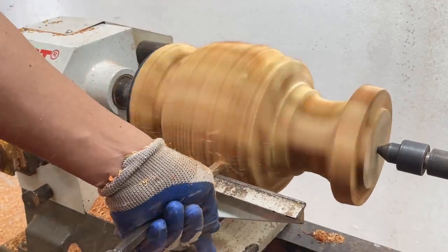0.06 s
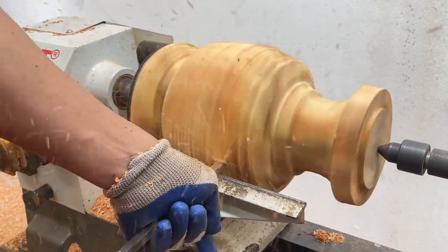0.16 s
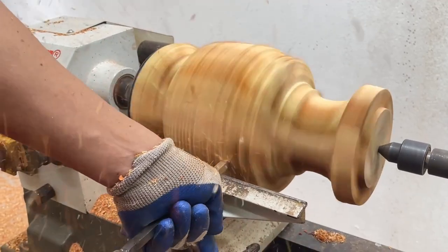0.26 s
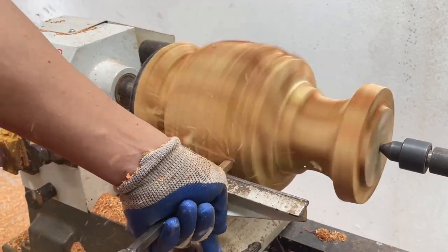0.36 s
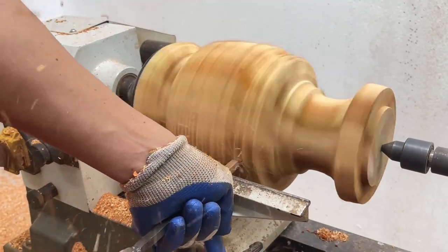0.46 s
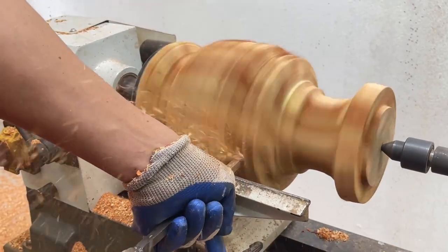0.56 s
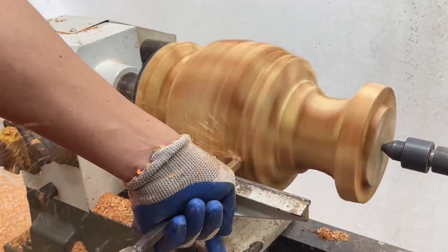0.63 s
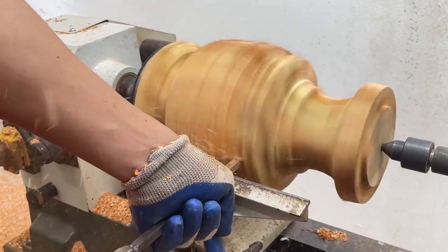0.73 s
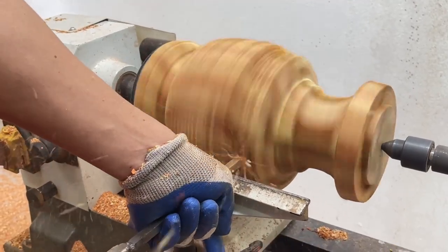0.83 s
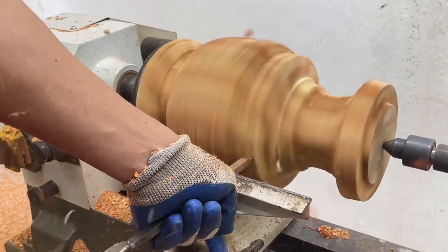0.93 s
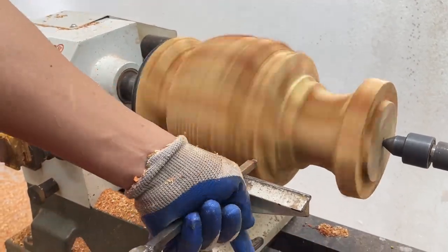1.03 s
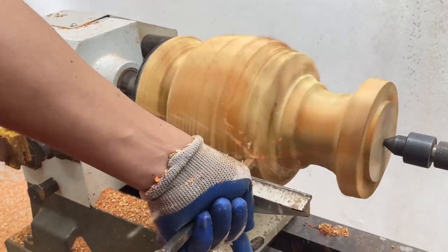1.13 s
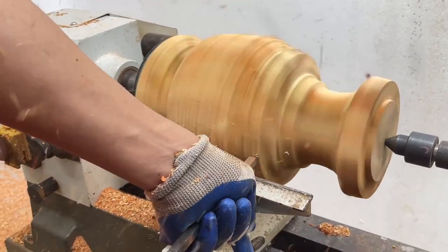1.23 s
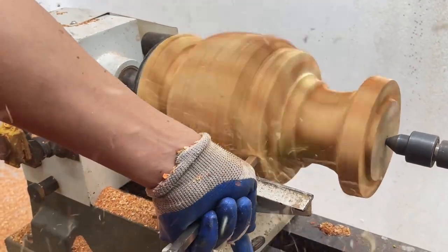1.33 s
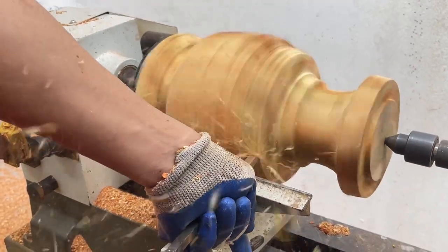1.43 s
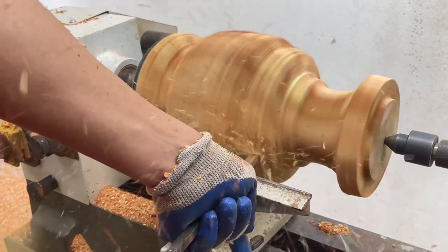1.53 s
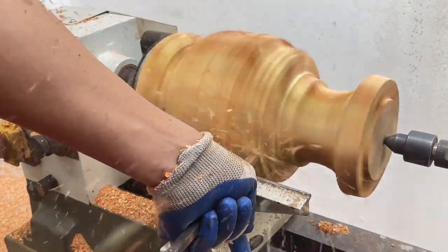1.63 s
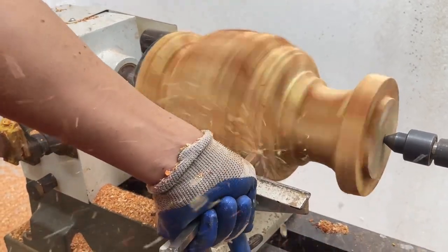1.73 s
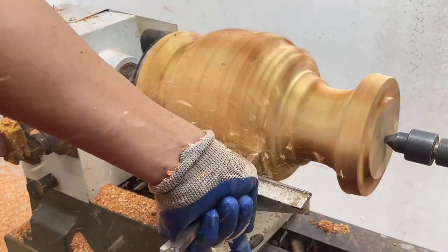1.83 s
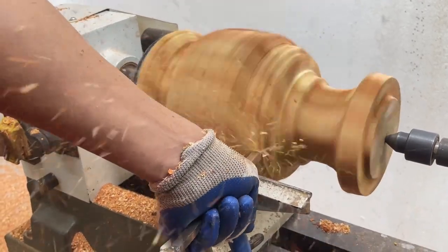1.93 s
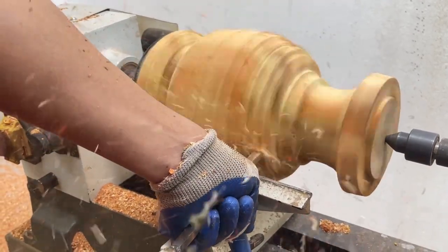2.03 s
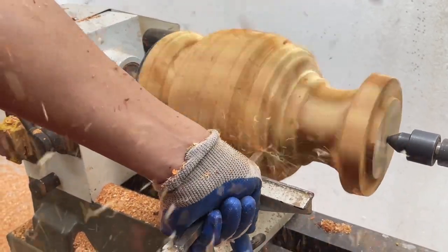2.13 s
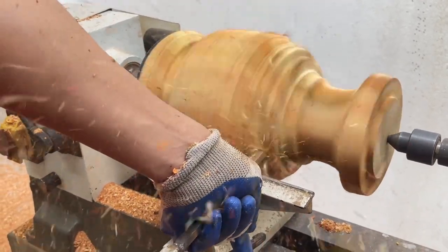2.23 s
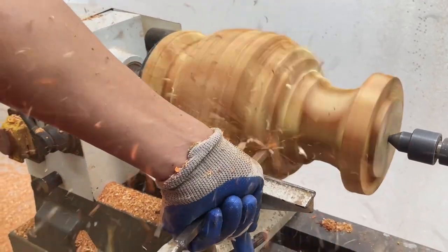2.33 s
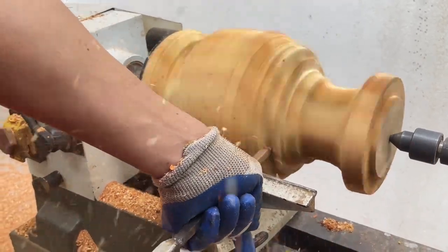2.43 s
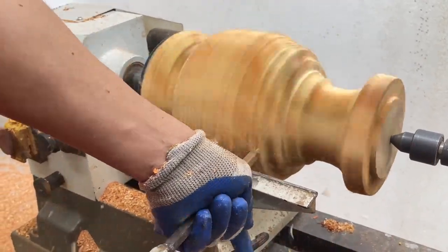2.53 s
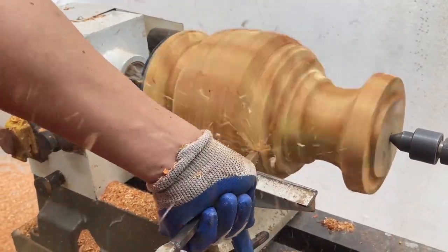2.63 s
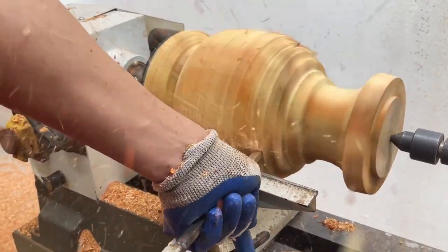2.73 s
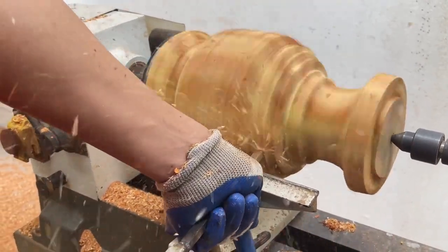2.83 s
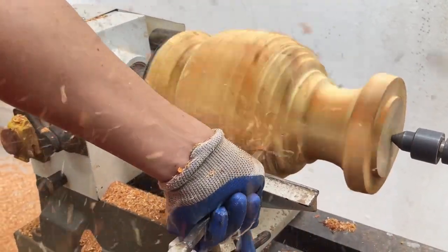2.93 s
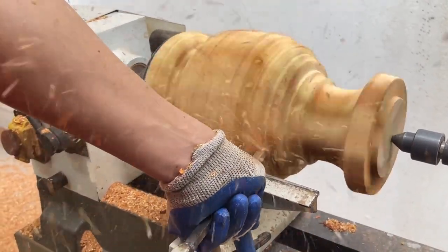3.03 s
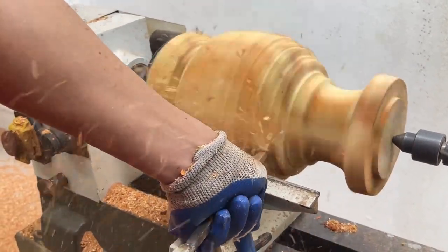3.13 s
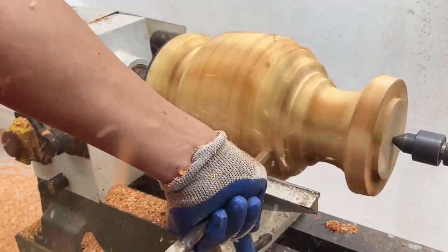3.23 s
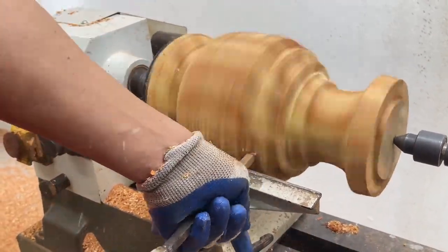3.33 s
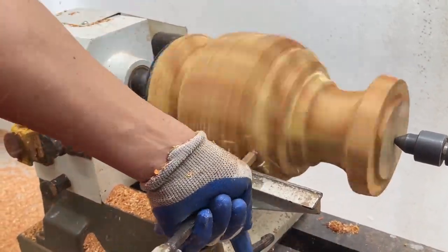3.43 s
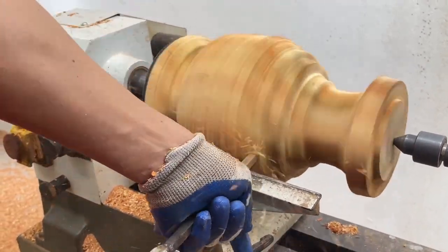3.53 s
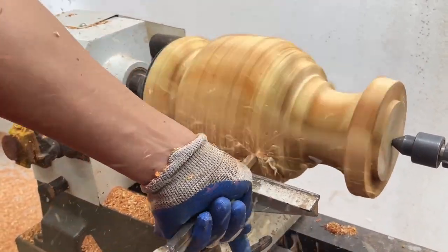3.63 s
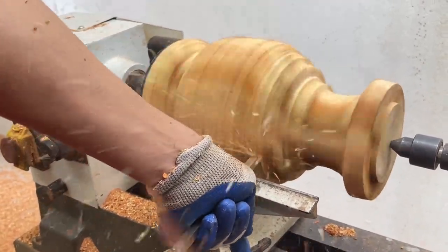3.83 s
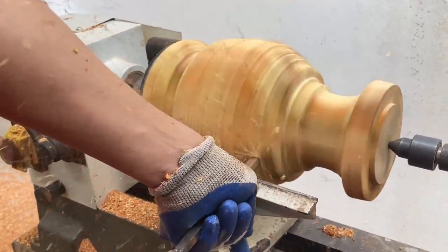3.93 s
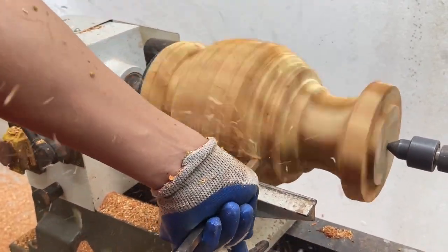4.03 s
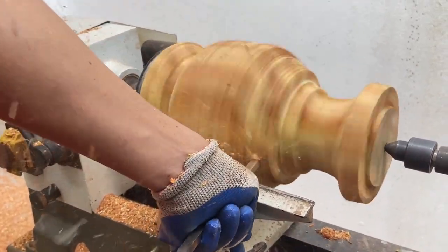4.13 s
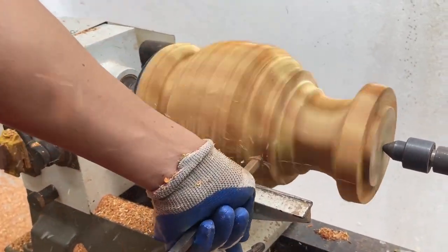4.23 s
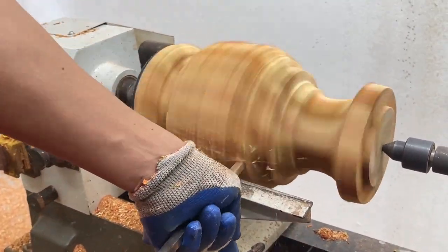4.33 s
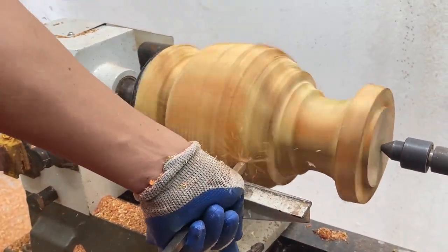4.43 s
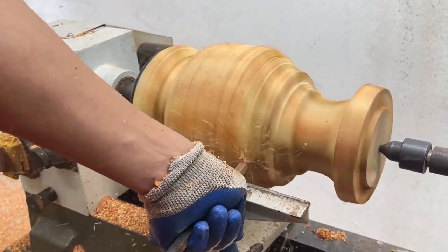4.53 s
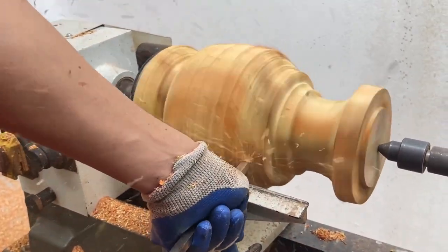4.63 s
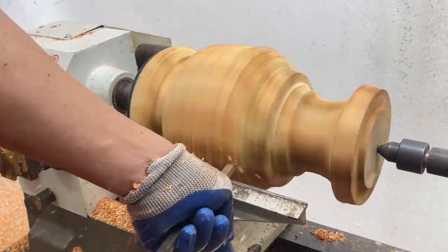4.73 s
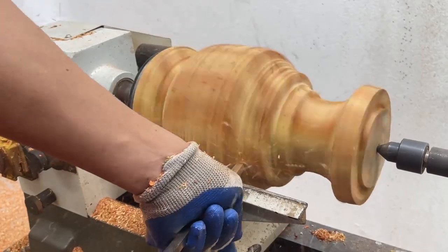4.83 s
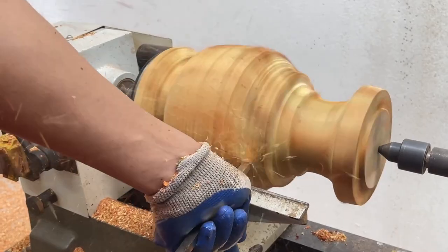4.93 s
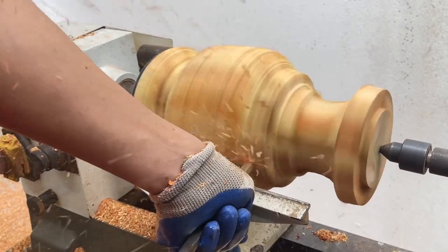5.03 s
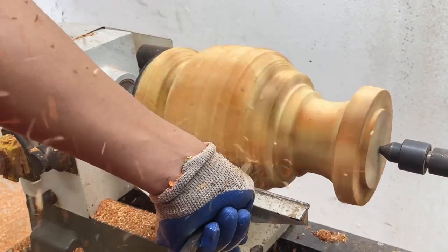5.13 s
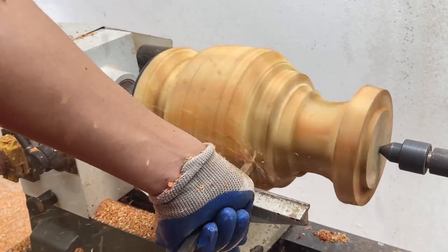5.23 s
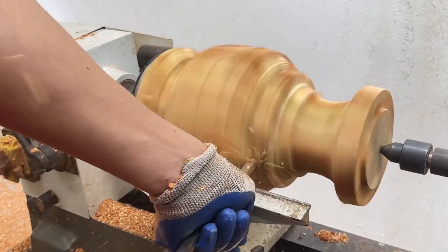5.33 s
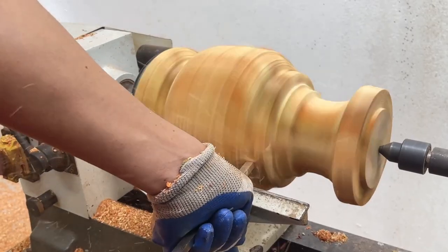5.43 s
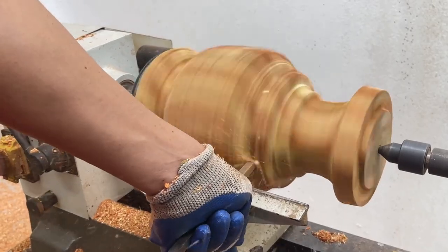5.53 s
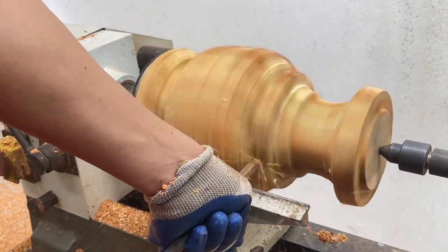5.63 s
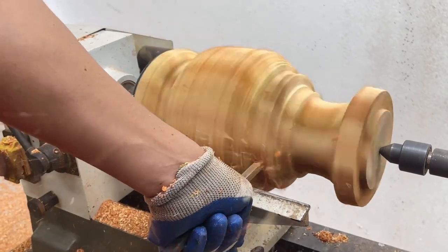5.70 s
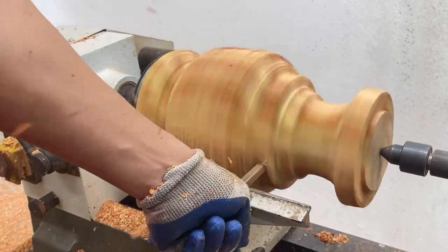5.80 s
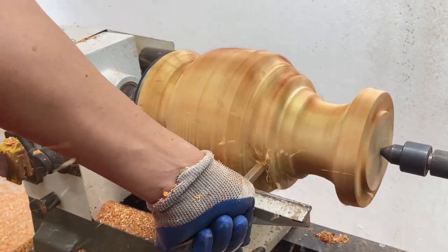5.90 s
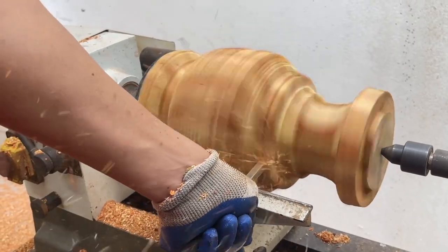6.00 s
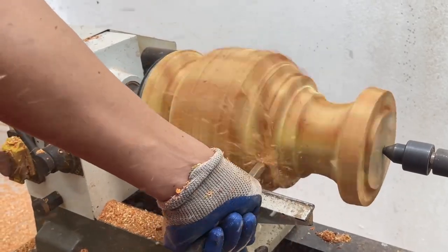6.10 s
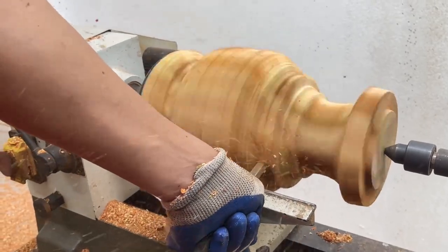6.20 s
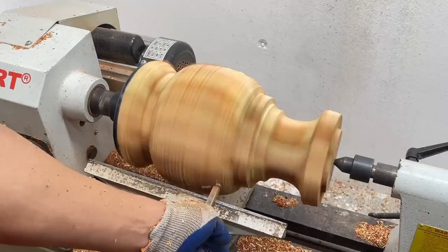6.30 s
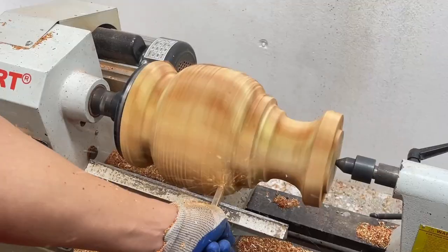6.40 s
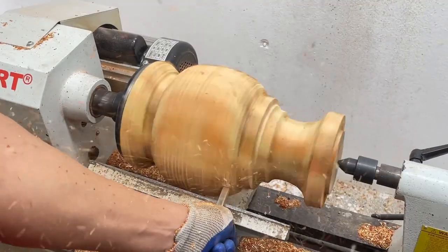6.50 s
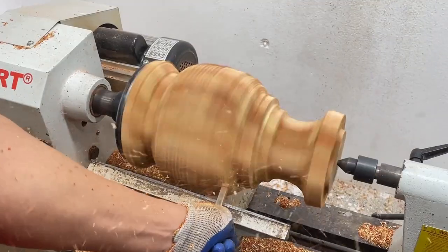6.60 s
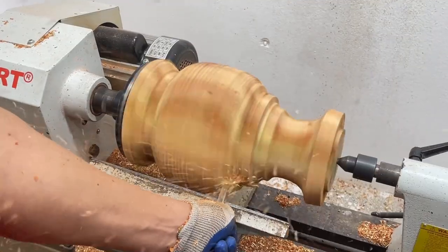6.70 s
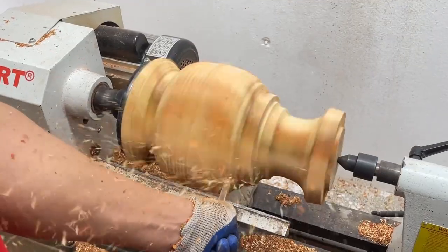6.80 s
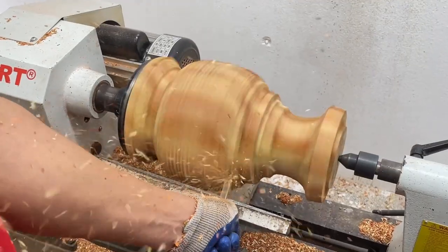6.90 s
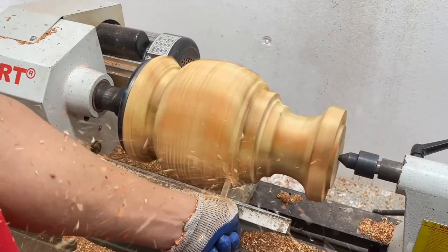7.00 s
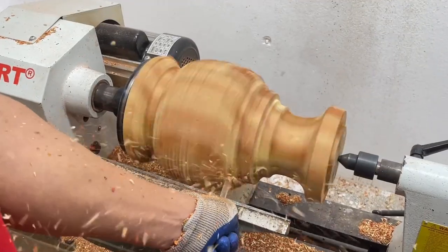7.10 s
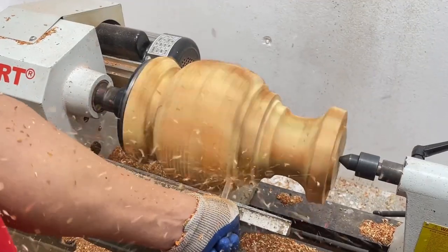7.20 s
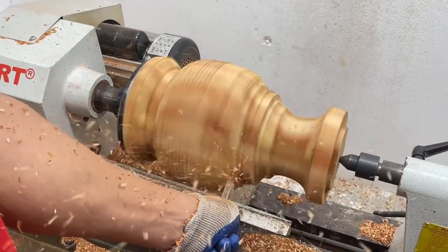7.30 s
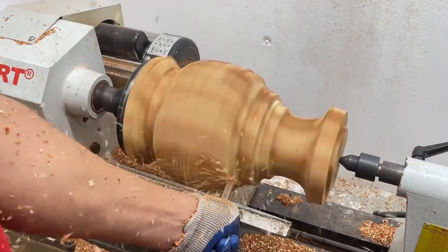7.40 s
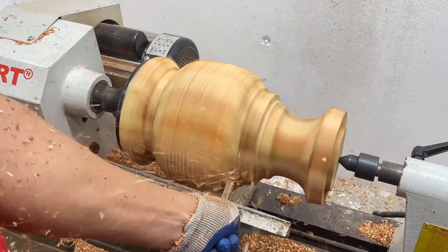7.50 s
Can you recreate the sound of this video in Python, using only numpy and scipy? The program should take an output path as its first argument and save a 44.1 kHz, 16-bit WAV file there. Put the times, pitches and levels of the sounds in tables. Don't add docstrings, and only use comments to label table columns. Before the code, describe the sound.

A close stereo microphone in a small, fairly dry workshop hears a lathe motor whining low-mid, with bearing noise, as a gouge cuts spinning wood. At first contact is light; by 0.3 s a bright, gritty hiss fills in, and the tool rest sings a buzzing, beating tone around 0.7-0.85 s. Near 1.0-1.15 s the cut falls away, exposing the whine and a tiny squeak, then bites back. Thick tearing continues with glassy steel ringing around 1.9 and 3 s. Short lift-offs come near 2.55, 3.4-3.6, 4.35 and 4.8 s, each followed by a sharp bite. Chatter hums in bursts from 5.2 to 5.7 s; the blade shank sings loudest around 5.8-6.3 s. At 6.33 s sound vanishes for an instant, then resumes with changed wood resonance, hissing strongly until a final easing around 7.5 s. Dull thuds recur throughout.

```python
import sys
import numpy as np
from scipy import signal
from scipy.fft import rfft, irfft, next_fast_len
from scipy.io import wavfile
from scipy.ndimage import uniform_filter1d

SR = 44100
rng = np.random.default_rng(int(sys.argv[2]) if len(sys.argv) > 2 else 0)


def level_to_linear(level):
    exponent = np.asarray(level, float) / 20
    return 10 ** exponent


def to_wav(s):
    ch = np.atleast_2d(s).T
    pcm = np.round(np.clip(ch, -1, 1) * 32767)
    wavfile.write(sys.argv[1], SR, pcm.astype(np.int16))


N = 332955
T = np.arange(N) / SR
LONG = next_fast_len(N)
HZ = np.fft.rfftfreq(LONG, 1 / SR)
BREAK_S, RESUME_S = 6.328, 6.3445
BLADE_EDGE_DB = 12


def evened(x):
    return x / np.sqrt(np.mean(x ** 2) + 1e-20)


def filtered(x, response):
    return irfft(rfft(x, LONG) * response, LONG)[..., :N]


def coloured(x, response):
    return evened(filtered(x, response))


def below(hz, steepness):
    return 1 / (1 + (HZ / hz) ** steepness)


def above(hz, steepness):
    return 1 / (1 + (hz / (HZ + 1)) ** steepness)


def shape(points):
    hz, db = np.transpose(points)
    return level_to_linear(np.interp(np.log(HZ + 1), np.log(hz + 1), db))


def modes(table):
    total = 0
    for k, (hz, width_hz, db) in enumerate(table):
        damping = 1j * width_hz * HZ
        total = total + (-1) ** k * level_to_linear(db) * damping / (hz ** 2 - HZ ** 2 + damping)
    return total


def resonate(x, hz, width_hz):
    turn = np.exp(2j * np.pi * np.cumsum(hz * np.ones(N)) / SR)
    r = np.exp(-np.pi * width_hz / SR)
    return evened((turn * signal.lfilter([1 - r], [1, -r], x / turn)).real)


def drift(top_hz):
    return coloured(rng.standard_normal(N), below(top_hz, 4))


def decaying(x, decay_s):
    return signal.lfilter([1], [1, -np.exp(-1 / (decay_s * SR))], x)


def bumps_db(rows, power=2):
    return sum(db * np.exp(-((T - s) / half) ** power) for s, half, db in rows)


def humps(rows, edge_db):
    power = 0
    for middle, half, db, *_ in rows:
        away = np.minimum(abs(T - middle) / half, 3)
        power = power + level_to_linear(db - edge_db * away ** 2.65) ** 2
    return np.sqrt(power)


# hz, level_db
OVERTONES = [(568, -56.5), (855.9, -60.5), (1098, -67), (1400, -63)]
# hz, density_db_per_hz
MOTOR_NOISE = [(200, -10.5), (330, 6.5), (500, -18), (850, -1.5), (1400, -9.5), (2500, -15), (4000, -17.5),
               (7300, -13.5), (8500, -26), (11000, -43), (15700, -38)]
# middle_s, half_s, whine_db
FREE = [(0.05, 0.26, -39), (0.9, 0.07, -40.5), (1.12, 0.093, -36), (1.36, 0.035, -39.5), (2.6, 0.079, -42),
        (3.24, 0.036, -43), (3.45, 0.057, -41), (3.6, 0.14, -43), (4.38, 0.086, -46), (4.84, 0.036, -38),
        (5.28, 0.055, -44), (5.88, 0.56, -47), (6.39, 0.047, -31.5), (6.49, 0.051, -37),
        (6.68, 0.025, -38.5), (7.04, 0.028, -42), (7.5, 0.14, -46.5)]


def motor():
    whine_hz, loaded_db = 286.4, -51
    whine_db = 20 * np.log10(np.hypot(level_to_linear(loaded_db + 2.2 * drift(2.9)), humps(FREE, edge_db=5.5)))
    turned_s = np.cumsum(1 + 0.0036 * drift(3.66)) / SR
    whine = np.sqrt(2) * np.cos(2 * np.pi * whine_hz * turned_s)
    sound = level_to_linear(whine_db - 4.5 + 3.8 * drift(25.0)) * whine
    noise = rng.standard_normal((2, N))
    for hz, db in OVERTONES:
        sound = sound + level_to_linear(db + 0.78 * (whine_db + 42)) * resonate(noise[0], hz, 24)
    squeaking = (T > 1.078) & (T < 1.143)
    sound = sound + level_to_linear(-56) * squeaking * resonate(noise[0], 4845, 25)
    return sound + level_to_linear(-48.5) * coloured(noise, shape(MOTOR_NOISE))


# hz, density_db_per_hz
THUD = [(20, -36), (45, -29), (70, -22), (110, -10.5), (160, 0), (230, -2), (340, 3.5), (480, -50)]
# middle_s, half_s, change_db
SHIFTS = [(0.037, 0.18, 7), (0.324, 0.087, -12), (0.673, 0.12, 7.5), (2.118, 0.067, 8), (2.314, 0.014, 13),
          (2.44, 0.073, -22), (3.015, 0.17, -1.5), (3.34, 0.11, 8), (3.486, 0.028, 10), (3.778, 0.079, -7),
          (4.173, 0.068, -7), (4.363, 0.14, 10), (4.88, 0.049, 9.5), (5.203, 0.021, 12), (5.606, 0.087, -2),
          (6.078, 0.059, 12), (6.301, .25, 7.5), (6.824, 0.081, -12), (6.97, 0.067, 4.5),
          (7.251, 0.17, -38)]
# time_s, level_db
KNOCKS = [(.262, 5), (.353, 7), (.802, 2), (1.148, 7), (1.628, 10), (1.895, 11), (2.56, 2), (3.249, 10),
          (3.707, 10), (3.837, 10), (4.308, 7), (4.689, 15), (5.401, 11), (5.744, 4), (5.914, 2),
          (5.984, 11), (6.09, 9.5), (6.401, 5), (6.485, 7), (6.985, 2), (7.408, 8)]


def thuds():
    thud_db, knock_s, deep_hz, deep_rest_db, deep_lumps_db = -57, .014, 150, -2, 1.5
    shift_db = bumps_db(SHIFTS, power=4)
    knock_db = bumps_db([(s, knock_s, db) for s, db in KNOCKS])
    lumps = drift(6.7)
    sound = coloured(rng.standard_normal((2, N)) * level_to_linear(2.8 * drift(25.0)), shape(THUD))
    deep = filtered(sound, below(deep_hz, 8))
    deep_db = np.minimum(deep_rest_db + deep_lumps_db * lumps + knock_db, 3)
    sound = sound + (level_to_linear(deep_db) - 1) * deep
    return level_to_linear(thud_db + shift_db + knock_db + 1.9 * lumps) * sound


# start_s, leaving_s, clear_s, biting_s, drop_db
LIFTS = [(-0.1, .01, 0.086, 0.039, -11), (0.86, 0.013, 0.075, 0.015, -5.5), (1.0, 0.084, 0.095, 0.046, -42),
         (1.259, 0.0065, 0.039, .015, -2.5), (1.307, 0.012, 0.013, 0.012, -17),
         (2.496, 0.044, 0.046, 0.1, -22), (2.562, .01, .03, .014, -16), (3.54, .012, .022, .006, -5),
         (4.335, 0.011, 0.051, 0.01, -23), (4.79, 0.014, 0.025, .004, -12),
         (5.876, 0.025, 0.01, 0.0085, -25), (6.345, .003, 0.027, .01, -8),
         (3.344, 0.061, 0.052, 0.017, -33), (3.425, 0.012, 0.023, 0.013, -5),
         (3.46, 0.0041, 0.12, 0.013, -6.5), (3.522, 0.025, 0.027, 0.012, -34),
         (4.307, 0.06, 0.0087, 0.13, -18.5), (4.767, 0.016, .01, 0.13, -25),
         (5.84, 0.044, 0.0088, 0.082, -12), (5.72, 0.018, 0.0083, 0.024, 0.5),
         (6.326, 0.0047, 0.029, 0.039, -22), (6.332, 0.0051, 0.09, 0.022, -8.5),
         (6.63, 0.019, 0.032, 0.048, -5.5), (7.541, 0.017, 0.074, 0.12, 7)]


def lifted():
    leave_curve, bite_curve = 0.78, 1.76
    total_db = 0
    for start, leaving, clear, biting, db in LIFTS:
        off = np.clip((T - start) / leaving, 0, 1) ** leave_curve
        still_off = np.clip(1 - (T - start - leaving - clear) / biting, 0, 1) ** bite_curve
        total_db = total_db + db * off * still_off
    return total_db


# time_s, peak_db
DIGS = [(.9222, -25), (0.9518, -21), (0.9676, -20), (1.213, -19), (1.225, -22), (1.247, -24), (1.3473, -22),
        (1.62, -22), (2.6145, -30), (2.6413, -20), (3.1726, -21), (3.473, -34), (3.5845, -22),
        (4.4039, -23), (4.4267, -24), (4.8404, -15), (5.9264, -29), (6.311, -21), (6.4378, -22),
        (6.4756, -21), (7.0687, -22), (7.172, -23), (7.3835, -25)]
# middle_s, half_s, level_db
SURGES = [(0.048, 0.0033, 7), (0.223, 0.008, 4.5), (0.265, 0.0192, 2.0), (0.385, 0.014, 3.1),
          (0.53, 0.0243, 3), (0.688, 0.0067, 2.5), (0.931, 0.0056, 7), (0.99, 0.0049, 3.8),
          (1.216, 0.0082, 3), (1.258, 0.0041, 3), (1.42, 0.0083, 5), (1.536, 0.017, 2.5),
          (1.721, 0.0055, 1), (1.766, 0.0096, 1), (1.91, 0.005, 2.5), (2.088, 0.0039, 2),
          (2.118, 0.016, 1.5), (2.247, 0.0052, 1.5), (2.323, 0.0078, 3), (2.37, 0.009, 3.5),
          (2.427, 0.0069, 5.5), (2.445, 0.0082, 4), (2.678, 0.0217, 1.5), (2.81, 0.017, 2.0),
          (2.85, 0.01, 4), (2.967, 0.0036, 4), (3.007, 0.0097, 2), (3.278, 0.0068, 2.5),
          (3.331, 0.079, -0.5), (3.49, 0.0087, 6), (3.735, 0.0093, 5), (3.786, 0.021, 3.5),
          (3.864, 0.0048, -3), (3.944, 0.0073, 1.5), (4.075, 0.007, -1), (4.226, 0.0053, 4),
          (4.51, 0.013, 2.1), (4.645, 0.006, 3), (4.72, 0.034, 4.0), (5.159, 0.0062, 2), (5.176, 0.0044, 7),
          (5.286, 0.0089, -0.5), (5.361, 0.0082, -1), (5.452, 0.0069, 3), (5.66, 0.0038, 5),
          (5.774, 0.0036, 0), (5.783, 0.015, 3.5), (6.003, 0.0101, 4), (6.114, 0.0054, -4),
          (6.196, 0.014, 2), (6.311, 0.0053, 2.8), (6.47, 0.004, 1), (6.967, 0.0076, 0.5),
          (7.105, 0.0073, 1), (7.254, 0.0076, 2.5), (7.42, 0.015, -2.5), (7.471, 0.012, 1.5),
          (7.543, 0.0063, 4.5)]


def tearing():
    snaps_per_s, fray_s, chip_over_db, chip_s, chip_share = 1200, 0.00054, 13.0, .0012, .8
    dig_rise_s, dig_fall_s = .004, 0.008
    grain = level_to_linear(0.11 * drift(60.0) + 0.25 * drift(130.0)) * level_to_linear(bumps_db(SURGES))
    snaps = level_to_linear(4.0 * np.minimum(rng.exponential(1, N), 3.3)) * (rng.random(N) < snaps_per_s / SR)
    burst = decaying(snaps, fray_s)
    dig = 1 + chip_share * decaying(snaps > level_to_linear(chip_over_db), chip_s)
    for s, db in DIGS:
        rise = np.clip((T - s) / dig_rise_s, 0, 1)
        dig += level_to_linear(db + 19.5) * rise * np.exp(-np.clip(T - s, 0, 1) / dig_fall_s)
    return dig * grain * np.sqrt(1 + 0.11 * evened(burst) ** 2)


# start_s, swing_from, swing_to, low_mode_from_db, low_mode_to_db
PASSES = [(0.0, -0.47, .15, 5, -3), (1.15, 0.074, 0.44, 14.5, 13), (1.9, 0.56, 1.05, 13, 10.5),
          (2.58, 0.15, 0.99, 9, 16.5), (3.42, 0.17, 0.11, 11, 8), (3.85, .1, 0.98, 12.5, 14.5),
          (4.39, 0.31, 0.62, 14, 6.5), (4.82, 0.31, 0.53, 4, 12), (5.05, 0.65, 0.79, 13.5, 8.5),
          (5.72, 0.29, 0.46, 3, -11), (5.9, 0.25, 2.4, 6.5, 2), (6.34, 0.36, 0.4, 5, 16.5),
          (6.7, 0.55, 0.9, 14, 26)]


def swing():
    start, swing_from, swing_to, db_from, db_to = np.transpose(PASSES)
    k = np.clip(np.searchsorted(start, T, "right") - 1, 0, None)
    done = (T - start[k]) / np.diff(np.append(start, N / SR))[k]
    buried = swing_from[k] + (swing_to - swing_from)[k] * done
    return buried, db_from[k] + (db_to - db_from)[k] * done


# hz, density_db_per_hz
FIBRES = [(2000, -55), (3450, -13), (3650, -8), (3880, -10), (4150, -16), (4500, -16.5), (5000, -1),
          (8000, 0), (9000, 3.5), (10200, 1), (12000, -3.5), (13600, 3.5), (15700, -20)]
# hz, width_hz, level_db
STEEL = [(6080, 60, -9), (6450, 60, -8), (6610, 70, -7), (7000, 36, -9), (7220, 60, -8), (7400, 30, -8),
         (8930, 370, -11), (10800, 100, -3), (11350, 110, -4), (11590, 60, -3), (12650, 400, -8),
         (14800, 280, -3), (15600, 120, -6)]


def fibre_hiss(air, steel, buried):
    bright_db = 14 - 28 * np.maximum(buried, 0) ** 0.78
    hiss = coloured(air, shape(FIBRES)) + level_to_linear(3.0) * coloured(steel, modes(STEEL) * (HZ > 3000))
    top = filtered(hiss, above(12500, 16))
    return hiss + (level_to_linear(0.3 * bright_db - 2.0) - 1) * top


# middle_s, half_s, level_db, from_hz, to_hz
GLIDES = [(0.065, 0.19, 10, 12400, 12700), (.4, 0.46, 4, 15100, 14400), (.62, 0.37, 13.5, 14200, 12700),
          (1.25, 0.13, 3, 13000, 12900), (1.5, 0.17, 11.5, 12600, 11900), (1.85, 0.2, 1, 12200, 11500),
          (2.552, .05, 3, 12900, 13000), (2.72, 0.15, 10, 13000, 11900), (3.0, 0.17, -9, 12200, 12100),
          (3.494, 0.091, 14.5, 12900, 13100), (3.73, 0.1, 15.5, 13050, 12600),
          (4.026, 0.12, 9.5, 12400, 12670), (4.549, 0.2, 8, 12900, 12400), (4.87, .06, 0, 13300, 13100),
          (6.395, .03, 3, 13100, 13200), (6.498, 0.094, 11, 13500, 12800), (6.7, 0.24, 9.5, 13000, 12600)]


def whistles(edge):
    out = np.zeros((2, N))
    for middle, half, db, hz_from, hz_to in GLIDES:
        hz = np.interp(T, [middle - half, middle + half], [hz_from, hz_to])
        out += humps([(middle, half, db)], edge_db=4.5) * resonate(edge, hz, 520)
    return out


# middle_s, half_s, level_db
FLUTE = [
    (1.85, 0.43, 5),
    (2.3, .3, -10),
    (3.05, 0.34, 6.5),
    (4.1, 0.18, 7),
    (4.6, 0.3, -7),
    (5.3, .4, -10),
    (6.0, 0.2, -8),
    (7.25, 0.36, 5.5),
]
# middle_s, half_s, level_db
SHANK = [
    (0.3, .5, -15),
    (2.35, 0.34, 1.5),
    (3.3, 0.11, 2),
    (4.25, 0.16, -0.5),
    (4.7, 0.12, -16),
    (5.3, 0.32, 0),
    (5.78, 0.25, 5),
    (6.17, 0.29, 6.5),
]


def blade_ring(air, edge, buried, low_db, lift_db):
    roll_hz = bumps_db([(5.97, 0.6, 420)]) * (T < RESUME_S)
    low_hz = 9207 - 330 * buried + 200 * (T > RESUME_S) - roll_hz
    blade = level_to_linear(low_db + .55 * lift_db) * resonate(edge, low_hz, 330) + whistles(edge)
    blade = blade + humps(FLUTE, BLADE_EDGE_DB) * resonate(air, 11260, 190)
    return blade + humps(SHANK, BLADE_EDGE_DB) * resonate(edge, 5186, 165)


# hz, width_hz, level_db
BODY = [(797, 45, -3), (943.5, 44, 0.5), (1092, 15.4, -1), (1229.5, 12.2, 7), (1390, 8.6, 9.5),
        (1640, 30, -4), (2033, 35.5, 2.5), (2236, 16.5, 0.5), (2690, 48, -0.5), (2920, 59, -4),
        (3162, 35, 3.5), (4434, 17, -2)]
# hz, width_hz, level_db
BODY_MOVED = [(843, 33, -2.5), (918, 46, -4.5), (982, 25, -2.5), (1253, 11, 5), (1383, 9.6, 12.5),
              (1550, 36, -8), (1720, 46, -5), (1895, 50, 3.5), (2030, 28, 9), (2267, 19, 1), (2670, 23, -3),
              (2894, 39, 3.5), (3140, 23, 1), (4470, 70, -17)]
# hz, density_db_per_hz
BODY_WASH = [(71, -63), (120, -32), (410, 10.5), (484, -4), (1360, 2), (2010, 3.5), (2450, -21), (3080, 1),
             (3430, -41), (4500, -36), (5850, -87), (9900, -120)]


def blank_and_rest(air, steel, edge):
    rings = np.where(T < RESUME_S, coloured(steel, modes(BODY)), coloured(steel, modes(BODY_MOVED)))
    flare = humps([(.38, .22, 8)], BLADE_EDGE_DB) * resonate(edge, 2730, 60)
    return coloured(air, shape(BODY_WASH)) + level_to_linear(7.0) * rings + flare


# time_s, hiss_db, body_over_hiss_db
PRESSURE = [(0.0, -50.5, -2), (0.17, -45, -1.5), (0.3, -36.5, -7.5), (0.85, -35, -1.5), (1.0, -33, -6.5),
            (1.5, -37.5, 1.5), (2.15, -33, -3), (2.8, -36, 0), (3.3, -37, -1), (3.62, -37, -1.5),
            (3.78, -35, -0.5), (4.6, -37.5, 0), (5.2, -34.5, -1.5), (5.5, -37, -1.5), (6.3, -37, -0.5),
            (6.6, -34.5, 2.5), (6.9, -33.5, 0.5), (7.55, -42.5, 3)]
# middle_s, half_s, change_db
PLOUGH = [(.3, .12, 0.5), (0.636, .04, -3.5), (0.977, 0.043, 3), (2.15, 0.06, 1), (2.524, 0.047, 3),
          (2.73, 0.2, -2), (3.49, 0.033, -3.5), (4.348, 0.018, -2), (4.86, .04, -1), (4.93, 0.025, 5),
          (5.264, 0.016, -5.5), (5.78, 0.023, -1.5), (5.85, 0.023, -2), (6.41, .03, 1.5),
          (6.595, 0.046, 5.5), (6.729, 0.024, 5)]
# hz, gain_db
LIGHT = [(1000, 3.5), (2200, 0.5), (2400, -5), (2730, 2), (3150, 2.5), (5200, -4), (6300, -1), (8500, -4.5),
         (11000, -4), (12300, -4), (15000, -3.5)]
# hz, gain_db
MOVED = [(300, -3), (1000, 2.5), (2000, -5), (2900, 0.5), (5200, -3.5), (7000, -2), (10000, -3),
         (11000, -0.5), (13500, 0.5), (14800, 2), (15700, -5)]


def cut(lift_db):
    ring_s, plough_hz, light_until_s = 0.012, 7500, 1.1
    time_s, hiss_db, body_db = np.transpose(PRESSURE)
    force = level_to_linear(np.interp(T, time_s, hiss_db) + lift_db + 0.5 * drift(14.4))
    fade = np.exp(-1 / (ring_s * SR))
    shaking = np.sqrt(signal.lfilter([1 - fade], [1, -fade], force ** 2))
    shaking = shaking * level_to_linear(np.interp(T, time_s, body_db) - 7.5)
    buried, low_db = swing()
    air, steel, edge = tearing() * rng.standard_normal((3, 2, N))
    hiss = fibre_hiss(air, steel, buried)
    blade = blade_ring(air, edge, buried, low_db, lift_db)
    near = force * (level_to_linear(3.0) * hiss + level_to_linear(-5.0) * blade) + shaking * blank_and_rest(air, steel, edge)
    near = near + (level_to_linear(bumps_db(PLOUGH)) - 1) * filtered(near, below(plough_hz, 12))
    notch_hz, notch_width_hz, notch_db = 3900, 160, -8
    away, damping = notch_hz ** 2 - HZ ** 2, 1j * notch_width_hz * HZ
    near = filtered(near, (away + level_to_linear(notch_db) * damping) / (away + damping))
    near = np.where(T < light_until_s, filtered(near, shape(LIGHT)), near)
    return np.where(T < RESUME_S, near, filtered(near, shape(MOVED)))


# middle_s, half_s, level_db, pitch_hz
SONGS = [(0.662, 0.031, -36, 415), (0.773, 0.097, -29, 415.7), (0.83, 0.039, -28.5, 413),
         (0.916, 0.026, -44, 422), (1.424, 0.097, -42.5, 422.4), (1.762, 0.3, -43.5, 426),
         (2.819, 0.047, -38.5, 414), (3.787, .06, -40.5, 423), (4.543, 0.018, -41, 424),
         (4.916, 0.018, -39, 412), (5.182, 0.01, -33, 414), (5.224, 0.02, -35, 416.7),
         (5.311, 0.038, -37.5, 419), (5.393, 0.035, -32.5, 421.6), (5.448, 0.017, -29, 420),
         (5.487, 0.014, -31, 415.5), (5.564, 0.12, -36, 425.5), (5.626, 0.06, -32.5, 409.5),
         (5.704, 0.0082, -31, 417.4), (6.09, 0.064, -39, 426), (6.215, 0.081, -36.5, 418.5),
         (6.586, 0.024, -37, 425), (6.846, 0.17, -40.5, 424.5), (7.199, 0.041, -36, 416.3),
         (7.272, 0.059, -41, 417.8), (7.385, 0.064, -40.5, 420)]


def chatter(lift_db):
    chatter_hz, width_hz, shaft_hz, beat_top_s = 419, 26, 19.5, .763
    hum_db = -47.5 + 0.78 * uniform_filter1d(lift_db, size=2000)
    hum = level_to_linear(hum_db - 24 * np.exp(-T / 0.049) + 2.0 * drift(1.7))
    level = np.hypot(hum, humps(SONGS, edge_db=6.5))
    level_db = 20 * np.log10(level)
    middle, _, _, pitch_hz = np.transpose(SONGS)
    waver = drift(6.06)
    hz = np.interp(T, middle, pitch_hz) + 3.094 * waver
    ring = resonate(rng.standard_normal((2, N)), chatter_hz, width_hz)
    ring = resonate(ring, chatter_hz, 44)
    turn = 2 * np.pi * np.cumsum(hz) / SR
    beat = 0.15 + 0.9 * (T > 0.7) * (T < 0.81)
    tone = np.cos(turn) + beat * np.cos(turn + 2 * np.pi * shaft_hz * (T - beat_top_s))
    tone = tone + level_to_linear(level_db + 13.5) * np.cos(2 * turn)
    locked = np.clip((level_db + 47.5) / 12, 0, .96)
    mix = np.sqrt(1 - locked ** 2) * ring + locked * tone * np.sqrt(2 / (1 + beat ** 2))
    return level * level_to_linear(.7 * waver[::-1] - 1.5) * mix


def workshop(x):
    decay_s, gap_s = .18, .003
    t = np.arange(SR // 4) / SR
    tail = rng.standard_normal((2, len(t))) * level_to_linear(-60 * t / decay_s) * (t > gap_s)
    return signal.fftconvolve(x, tail / np.linalg.norm(tail[0]), axes=1)[:, :N]


# hz, under_direct_db
WIDTH = [(60, -20), (150, -1), (300, -16), (450, -10.5), (1000, -11), (1700, -9), (2400, -5.5),
         (3100, -10.5), (4000, -2), (5200, -8.5), (6300, -16), (7900, -8.5), (9000, -17), (10100, -8),
         (11400, -13), (14100, -11.5), (15500, -12)]
# hz, left_lead_rad
LEAD = [(0, -.08), (1000, 0), (2400, -.25), (3100, -.25), (3800, -.12), (4500, -.3), (5900, -.05),
        (6600, .03), (7900, .45), (9000, .67), (11400, .54), (14500, .47), (16300, .1)]


def scene():
    lift_db = lifted()
    small_parts = motor() + cut(lift_db) + chatter(lift_db)
    dry = filtered(small_parts, above(210, 6)) + thuds()
    direct, diffuse = dry + level_to_linear(-8.5) * workshop(0.76 * dry + 0.5 * dry[::-1])
    step = level_to_linear(-0.3 * (HZ > 5500)) * np.exp(.5j * np.interp(HZ, *np.transpose(LEAD)))
    diffuse = filtered(diffuse, shape(WIDTH))
    return np.array([filtered(direct, step) + diffuse, filtered(direct, 1 / step) - diffuse])


def roll_off(x):
    return signal.sosfilt(signal.butter(12, 15850, fs=SR, output="sos"), x)


# middle_s, half_s, gain_db
GATED = [(0.405, 0.017, -11.0), (0.859, 0.031, -18.0), (1.453, 0.032, -16.0), (1.576, 0.027, -14),
         (1.695, 0.015, -17.0), (1.835, 0.019, -10), (2.079, 0.014, -15.0), (2.255, 0.044, -17.0),
         (2.441, 0.052, -14.0), (2.729, 0.029, -8.0), (3.168, 0.049, -18.0), (3.723, 0.038, -17),
         (3.865, 0.02, -10), (4.164, 0.054, -19.0), (5.567, 0.036, -18.0), (5.786, 0.03, -17.0),
         (6.589, 0.027, -20), (6.759, 0.021, -13.0), (6.888, 0.02, -12.0), (7.225, 0.13, -9),
         (7.176, 0.024, -17), (7.518, 0.012, -17.0)]


def record(dry):
    ceiling, gate_hz, edge_hz = .75, 185, 15750
    rolloff = signal.butter(N=2, Wn=30, btype="high", fs=SR, output="sos")
    kept = signal.sosfilt(rolloff, ceiling * np.tanh(dry / ceiling))
    gate_db = bumps_db(GATED, power=4)
    kept = kept + (level_to_linear(gate_db) - 1) * filtered(kept, below(gate_hz, 10))
    smear = level_to_linear(-20 - 1300 * np.clip(T - BREAK_S, 0, 1))
    kept = kept * np.where((T > BREAK_S) & (T < RESUME_S), smear, 1)
    edge = signal.firwin(numtaps=1501, cutoff=edge_hz, window=("kaiser", 10), fs=SR)
    kept = signal.oaconvolve(kept, edge[None], "same", axes=1)
    return roll_off(kept)


dry = scene()
out = record(dry)
to_wav(out)
```